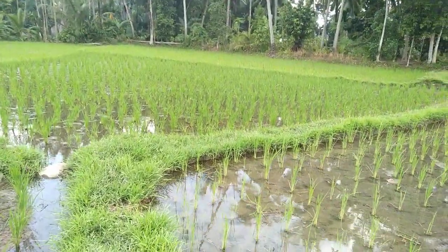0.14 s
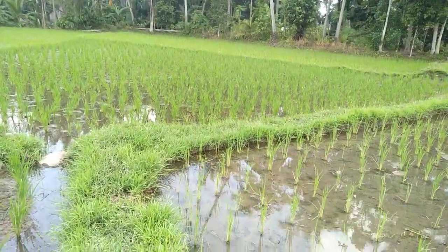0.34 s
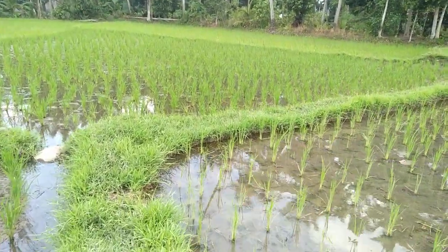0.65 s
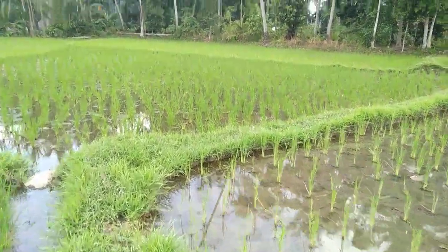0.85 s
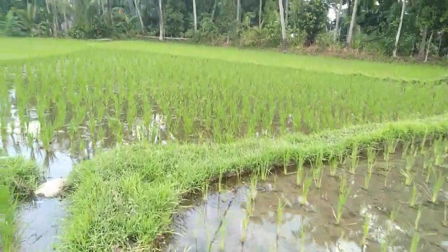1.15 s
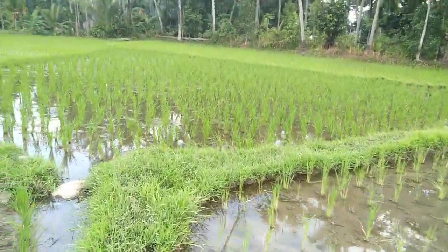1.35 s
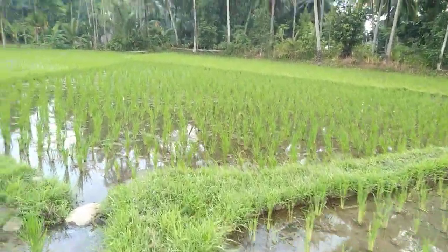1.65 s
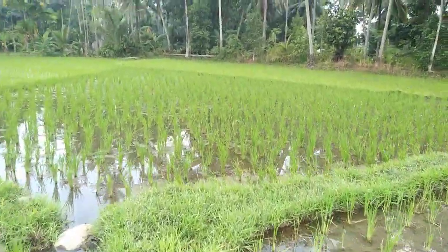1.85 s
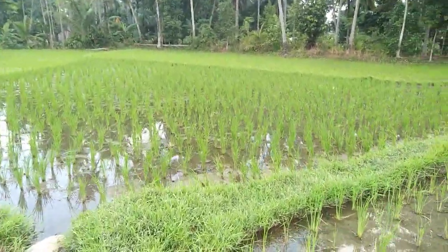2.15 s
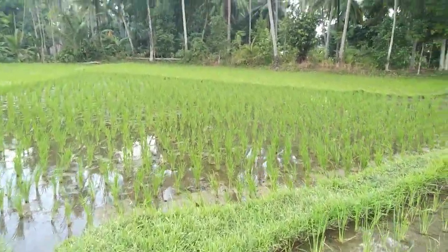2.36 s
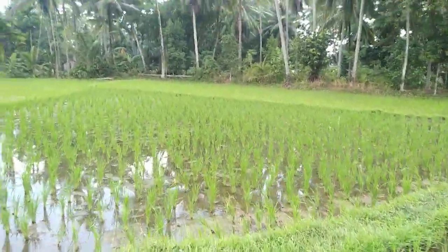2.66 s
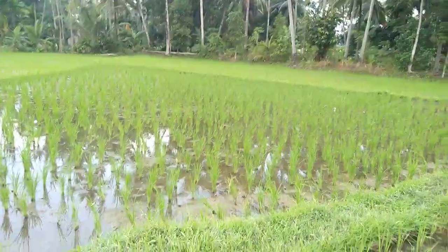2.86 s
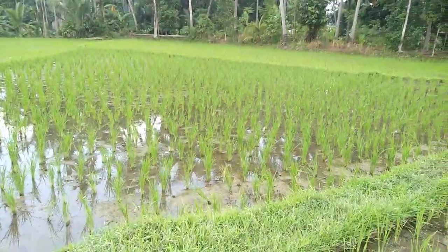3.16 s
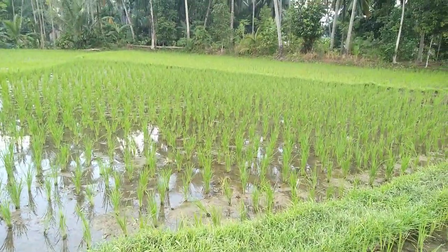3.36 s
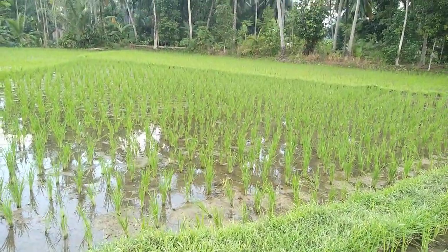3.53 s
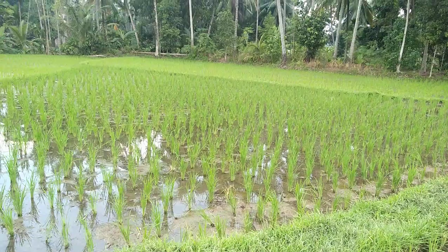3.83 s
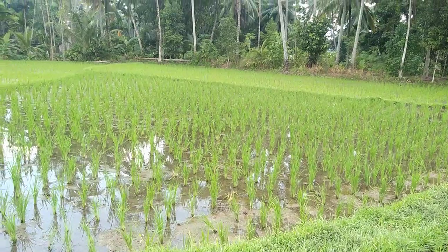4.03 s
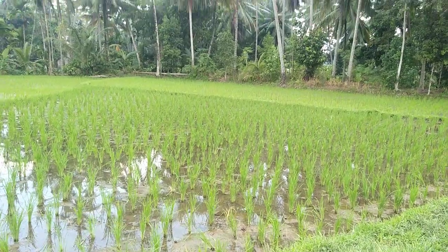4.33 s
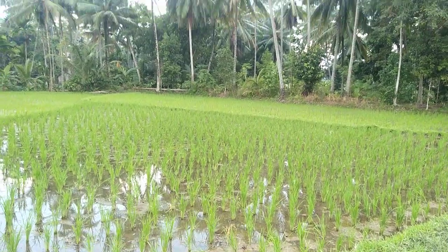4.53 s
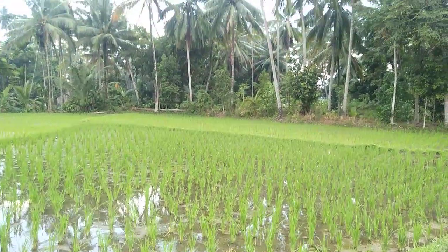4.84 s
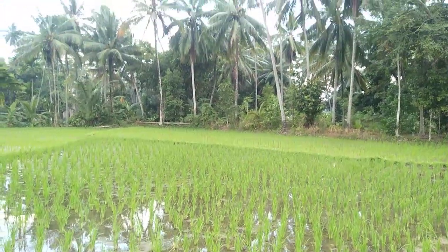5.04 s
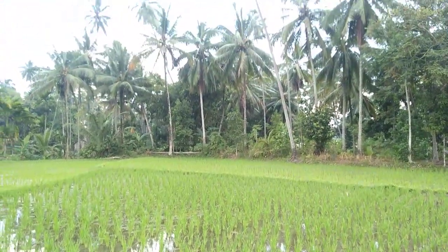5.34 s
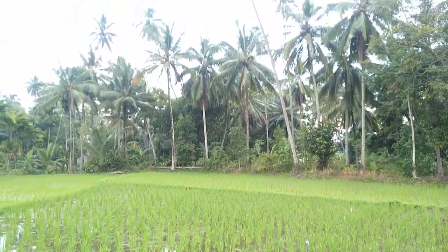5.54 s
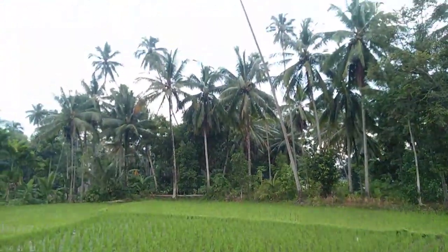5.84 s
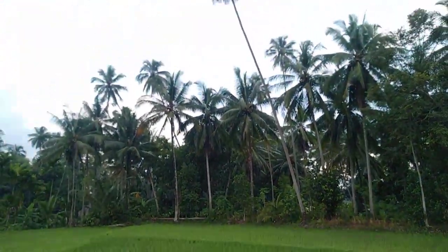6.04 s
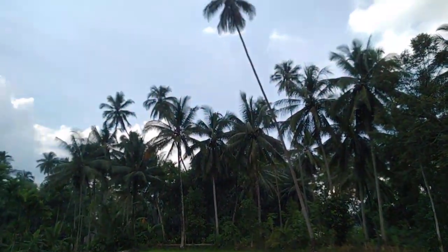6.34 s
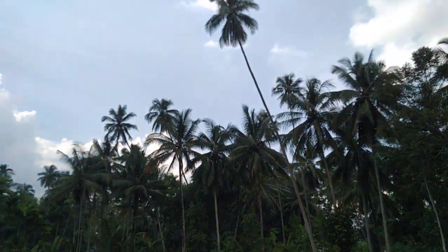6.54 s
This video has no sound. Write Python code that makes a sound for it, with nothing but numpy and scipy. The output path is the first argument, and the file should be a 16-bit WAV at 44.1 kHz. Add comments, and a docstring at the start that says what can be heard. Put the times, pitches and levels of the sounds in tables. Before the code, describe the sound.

Steady, piercing bird chirps with falling pitch lead throughout, with a short leafy echo. In the first three seconds, legs brush through grass in uneven swishes over soft footfalls; two or three dull clicks hit the microphone body. Afterwards the walking stops, leaving lumpy low rumble, blurred far fowl and soft hoots, while a remote engine pulses louder and a thin insect trill barely appears.

```python
"""A small bird repeats high falling chirps over flooded rice paddies; the palm grove throws them back.
Someone takes a few swishing steps along the grassy bank, bumps the camera twice and stands still.
Far off an engine drones and draws nearer, fowl call from behind the trees and an insect trills."""
import sys
import numpy as np
from scipy import signal
from scipy.fft import rfft, irfft
from scipy.io import wavfile
from scipy.ndimage import map_coordinates

SR = 44100
rng = np.random.default_rng(int(sys.argv[2]) if len(sys.argv) > 2 else 0)


def store_pcm(level_fs):
    """Save levels as 16-bit WAV."""
    pcm = np.round(np.clip(level_fs, -1, 1) * 32767).astype(np.int16)
    wavfile.write(sys.argv[1], SR, np.atleast_2d(pcm).T)


N = 295029

# one row a note: (s, rise s, fall s, start Hz, top Hz, end Hz, level dB)
CHIRPS = [
    (-.17, 0.0411, 0.0237, 4460, 5250, 4270, -48.5),
    (0.296, 0.01976, 0.091, 4286, 5252, 3598, -52.5), (0.412, 0.014, 0.0563, 4618, 5022, 3247, -51),
    (.878, 0.0118, .068, 4538, 5376, 3562, -51), (.998, 0.0462, 0.0262, 4440, 5021, 4415, -53),
    (1.5, 0.0093, 0.067, 4730, 5036, 3567, -48.5),
    (1.971, 0.01176, 0.0928, 4942, 5230, 3548, -51.5), (2.045, 0.037, 0.0273, 3980, 5000, 4037, -53),
    (2.561, 0.0419, 0.0505, 3300, 5012, 3647, -49),
    (3.06, 0.0203, 0.085, 4538, 5552, 3390, -49.5), (3.148, 0.0419, 0.021, 4380, 5254, 4434, -52),
    (3.652, 0.0124, 0.0824, 4350, 5430, 3346, -47.5), (3.722, 0.00876, 0.076, 4689, 5044, 3103, -53.5),
    (4.271, 0.0162, 0.1036, 4260, 5464, 3209, -49),
    (4.844, .01, 0.107, 4353, 5467, 3254, -48), (4.935, 0.05935, 0.0273, 4516, 5089, 4043, -53.5),
    (5.511, 0.0375, .085, 3670, 5149, 2973, -51),
    (5.972, 0.01618, 0.0903, 4400, 5440, 3318, -51), (6.07, 0.057, 0.0392, 4853, 5251, 3772, -56),
    (6.513, 0.0199, 0.0896, 4600, 5286, 3255, -51.5), (6.625, 0.0187, 0.04975, 4749, 5074, 3607, -55)]
BEAK = [(3000, -26), (3500, -18.5), (4100, -11), (4600, -5), (5000, -2.5), (5280, -5.5), (5600, -4.5)]  # (Hz, dB)
# other birds in the grove: (s, rise s, fall s, start Hz, top Hz, end Hz, roundness of the top, level dB)
WHISTLES = [
    (2.11, 0.022, 0.074, 4150, 4629, 4556, 1.114, -63.5), (3.64, 0.11, 0.0354, 5427, 6487, 6042, 1.56, -68),
    (4.745, 0.0119, 0.0445, 2603, 2674, 2500, 0.83, -75), (5.555, 0.0076, 0.091, 2215, 2232, 1962, 1.61, -67)]
# the clearer calls of distant fowl: (s, length s, start Hz, end Hz, level dB, octave above dB)
FAR_CALLS = [
    (-.1, 0.479, 367, 363.2, -67, -20), (.344, 0.101, 691.6, 764.7, -61.5, -15.5), (.395, 0.297, 733.9, 710.7, -71, 1.5), (.394, 0.308, 863, 902.9, -67.5, -39.5),
    (.855, 0.0804, 844.2, 784.6, -72, 1.5), (1.185, 0.0484, 753, 724, -61.5, -41.5), (1.472, 0.066, 817.8, 917, -63, -2.5), (1.62, 0.137, 879, 806, -70.5, -2),
    (1.852, 0.1107, 782, 1059, -65, -25), (2.031, 0.322, 827.5, 853.1, -67, -12.5), (2.181, 0.0496, 588.3, 641.3, -64, -10.5),
    (2.45, 0.212, 882, 834.2, -68.5, -9.5), (3.01, 0.128, 799.4, 783.4, -80.5, 14.5), (3.231, 0.125, 785.5, 779.2, -70, -2), (3.264, 0.3227, 572.8, 548, -74, -25.5),
    (3.61, 0.3355, 787.9, 765.4, -67, -8.5), (3.708, 0.17, 693.2, 665.6, -66.5, -28.5), (4.08, 0.053, 771, 757.5, -84.5, 8.5), (4.218, 0.0547, 771.4, 733, -68, -30),
    (4.395, 0.0528, 743.3, 720, -72, -12.5), (4.934, 0.0336, 848, 886.7, -67, -34.5)]
GRASS = [(530, -49), (900, -13), (1350, -23), (1430, -5), (1670, -31.5), (1880, -4.5), (2280, 5), (2660, 4),
         (3800, -9.5), (4380, -7), (6260, -5), (8950, -22), (10600, -21), (11800, -23.5), (15500, -41)]  # (Hz, dB per Hz)
# blows on the camera body and soft footfalls: (s, peak dB, ring Hz, t60 s, click dB against the peak)
KNOCKS = [(2.8131, -40, 587, 0.0142, -28), (2.8246, -21, 666, 0.00465, -8), (2.937, -18, 313, 0.01093, -13)]
FOOTFALLS = [(1.254, -38, 84.7, 0.044), (1.524, -33, 95.4, 0.0476), (1.906, -35.5, 82.8, 0.043), (2.015, -32.5, 92.4, 0.0181), (2.502, -29.5, 102.2, 0.01366), (2.521, -26.5, 119.5, 0.0241), (2.927, -31.5, 134.4, 0.026), (5.265, -45.5, 69.7, 0.0539)]  # (s, peak dB, Hz, length s)
SNAPS = [(0.0632, -48), (0.374, -51.5), (.894, -46), (.918, -43.5), (1.803, -63), (2.506, -42.5), (2.699, -46), (2.722, -43), (3.098, -53)]  # stalks: (s, peak dB)
# air on the microphone is strongest while walking: (s, dB)
RUMBLE = [(0, -55), (.3, -58.5), (.9, -74.5), (1.08, -58), (1.4, -53), (1.55, -49), (2.2, -49), (3.05, -46.5), (3.25, -54.5), (3.6, -58.5), (3.9, -48.5), (4.3, -54), (5.3, -55.5), (5.7, -68), (5.98, -53.5), (6.3, -60.5), (6.69, -51)]
RUMBLE_TONE = [(15, -2.5), (30, -2), (60, 5), (100, 2.5), (150, 1), (190, -13.5), (260, -27), (500, -56.5)]  # (Hz, dB per Hz)
RUB_TONE = [(150, -16), (230, 14), (320, 10.5), (420, -11), (600, -28.5), (1000, -21), (2000, -33.5), (4000, -47.5)]  # (Hz, dB per Hz)
# the boom of the exhaust shifts as the engine moves: (s, centre Hz)
BOOM = [(0, 127.3), (2.9, 132.1), (3.3, 116.4), (4.6, 133.4), (5.6, 158), (5.85, 133.4), (6.2, 148.5), (6.42, 114.6), (6.69, 114)]
FLOOR = [(20, -23.5), (100, 1.5), (250, -16), (500, -12.5), (900, -18), (1500, -18), (3000, -22), (5000, -24), (8000, -25), (12000, -26), (15500, -27)]  # (Hz, dB per Hz)
INSECT = [(0, -99), (1.2, -90), (4.75, -108), (4.9, -91), (5.4, -85.5), (5.85, -93), (6.1, -86.5), (6.69, -83.5)]  # (s, dB)
LEAD = SR // 2  # calls already under way still echo
EDGE_HZ = 15700  # fixed
TIME = np.arange(N) / SR
# the engine: (s, firings a second)
SPEED = [(0, 28.97), (1.1, 27.2), (1.6, 26.65), (2.2, 27.8), (3, 28.42), (3.4, 27.15), (3.85, 26.2), (4.25, 26.13), (4.7, 26.1), (5, 29.52), (5.3, 28.8), (5.65, 30.7), (6, 29.8), (6.28, 29.65), (6.45, 29.2), (6.69, 24.63)]
# it draws nearer, fading in and out across the fields: (s, dB at the boom)
DRONE = [(0, -59), (.9, -72.5), (1.6, -57), (3.1, -50), (3.55, -57.5), (3.85, -51), (4.1, -60), (4.62, -53), (4.77, -71), (4.92, -46.5), (5.1, -53), (5.3, -45), (5.68, -55.5), (5.85, -46.5), (6.2, -45), (6.69, -43.5)]
# the blur of far-off animals behind the trees: (s, dB) and (Hz, dB per Hz)
DIN = [(0, -72), (1, -75.5), (1.8, -69), (2.7, -84.5), (3.3, -72), (4.2, -80.5), (5, -82), (6, -77), (6.69, -106)]
DIN_TONE = [(200, -3), (400, 3), (560, -9), (800, 0.5), (1050, -15), (1300, -10), (1600, -24.5), (2200, -43), (4000, -58)]
# single reflections from water and bank: (delay s, dB)
SLAPS = [(.0011, -20), (.0047, -6.5), (0.0133, -16)]
ROUND_SLOW, ROUND_QUICK, ROUND_S = 1.08, 1.8, 0.029  # short notes have the rounder top
# soft low hoots, perhaps a dove: (s, length s, level dB)
COOS = [(3.983, 0.0655, -68.5), (4.273, 0.163, -70.5), (4.578, 0.168, -65.5), (5.336, 0.0655, -67.5), (5.74, 0.1085, -64.5)]
# a leg sweeps through the grass: (s at full speed, hold s, level dB, fizz dB and rasp dB against that level)
SWISHES = [(.365, 0.028, -84.5, 9, 10), (.55, .02, -83.5, 8, -7.5), (.615, 0.026, -69.5, -12, 5.5), (0.676, 0.108, -58, -15.5, 3), (.8, 0.1481, -55.5, -17, -1.5), (1.492, 0.0904, -54.5, -13, -3.5), (1.71, 0.057, -55, -19, -1),
           (1.85, 0.016, -69.5, -5.5, -14), (2.286, 0.034, -73, -15.5, 12), (2.383, 0.178, -57.5, -14, 2), (2.71, 0.0073, -74, 2.5, -2.5), (2.905, 0.033, -71.5, 10, -18), (2.982, 0.043, -54.5, -12, 2.5), (3.11, 0.0067, -60, -11, -0.5)]
SWISH_RISE_DB_PER_S, SWISH_START_S = 97, 0.0684  # the swell is steepest at first
SWISH_FALL_DB_PER_S, SWISH_STOP_S = 82, 0.159  # blades spring back, then settle ever faster
GUSTS_PER_S, GUST_DB = 11, 3.5
# the hand shifts on the camera: (s, length s, level dB)
RUBS = [(0.954, 0.027, -58.5), (2.142, 0.0646, -59.5), (2.544, .17, -54), (2.982, 0.1169, -56.5), (3.203, 0.044, -60), (4.17, 0.09, -60), (4.385, 0.0754, -61), (4.651, 0.0398, -63.5), (5.237, 0.04326, -63.5)]
GRIP_DB = -23  # the steady grip, against the rumble
BOOM_WIDTH_HZ = 14.5
MUTTER = [(0, -27), (4.8, -26), (5.9, -22.5), (6.3, -11), (6.45, -24), (6.69, -20)]  # level of the upper orders: (s, dB against the boom)
# each note keeps the end pitch given in its row
START_HZ = None
CLUCKS, CLUCK_S, CLUCK_LOW_HZ, CLUCK_HIGH_HZ, CLUCK_DB, CLUCK_OCTAVE_DB = 22, .06, 562.7, 952.7, -0.5, -24.5  # chance clucks, level against the din
COO_HZ, COO_OCTAVE_DB = 515.27, -22.5
TRILL_BURSTS_PER_S, TRILL_DEPTH_DB = 18, 4
ORDERS_DB = [(2, -19), (3, -11.5), (4, -7.5), (5, -7.5), (6, -10)]  # outside the boom: (order, dB)
SWEEP_DB_PER_KHZ_PER_S = 0.0923  # the whistle thins while its pitch moves fast
DROP_HZ = None
DROP_S = None
# a faint high tick, the bird's second voice, leads into each long falling note
TICK_LEAD_S, TICK_S, TICK_HZ, TICK_DB = 0.0071, 0.00864, 5632, -17.5
TICK_FALL_S = .09  # fixed
SNAGS_PER_S, SNAG_DB = 22, 1.0949  # blades catch and let go unevenly


def amp(db):
    """Decibels to gain."""
    return 10 ** (np.asarray(db) / 20)


def unit(x):
    """Scales to rms 1."""
    return x / np.sqrt(np.mean(x ** 2) + 1e-20)


def read(points, hz):
    """A spectrum table in dB, read on a log-frequency axis."""
    f, db = np.transpose(points)
    return np.interp(np.log(hz + 1), np.log(f + 1), db)


def follow(rows, t=TIME):
    """The columns of a curve table at the times t."""
    s, *columns = np.transpose(rows)
    return [np.interp(t, s, c) for c in columns]


def colour(x, points):
    """Filters x by a spectrum table."""
    return irfft(rfft(x) * amp(read(points, np.fft.rfftfreq(len(x), 1 / SR))), len(x))


def band(x, lo_hz, hi_hz, order=2):
    """Causal band-pass."""
    return signal.sosfilt(signal.butter(order, [lo_hz, min(hi_hz, SR / 2 - 1)], "band", fs=SR, output="sos"), x)


def drift(rate, size=N):
    """Smooth chance of rms about 1 that changes rate times a second."""
    knots = rng.standard_normal(4096)
    return map_coordinates(knots, [np.arange(size) * rate / SR], order=2, mode="wrap")


def add(mix, s, sound):
    """Mixes a sound in at s seconds."""
    part = mix[max(round(s * SR), 0):][:len(sound)]
    part += sound[:len(part)]


def grove(x, t60, onset):
    """Scatter from trunks and fronds: sparse reflections that build up and die away."""
    t = np.arange(SR) / SR
    taps = rng.standard_normal(SR) * (rng.random(SR) < 2500 / SR)  # fixed
    tail = taps * amp(-60 * t / t60) * (1 - np.exp(-(t / onset) ** 2))
    return signal.fftconvolve(x, tail / np.linalg.norm(tail))[:len(x)]


def sing(notes, beak, waver, flutter_db):
    """Each note is a pure whistle that sweeps up and slides down, loudest where the beak resonates."""
    out = np.zeros(N + LEAD)
    for s, rise, fall, start_hz, top_hz, end_hz, roundness, db in notes:
        t = np.arange(0, rise + fall, 1 / SR)
        up, down = np.clip(t / rise, 0, 1), np.clip((t - rise) / fall, 0, 1)
        hz = start_hz + (top_hz - start_hz) * (1 - (1 - up) ** np.clip(roundness, 1, 2)) - (top_hz - end_hz) * np.sin(np.pi / 2 * down ** roundness)
        thinning_db = SWEEP_DB_PER_KHZ_PER_S * abs(np.gradient(hz, t)) / 1000  # fixed
        hz = hz * (1 + waver * drift(243.4, size=len(t)))
        swell = np.minimum(t / 0.0059, 1) * np.minimum((t[-1] - t) / 0.0031, 1)
        level = swell * amp(db + 2 - thinning_db + read(beak, hz) + flutter_db * drift(121.94, size=len(t)))
        add(out, s + LEAD / SR, level * np.sqrt(2) * np.sin(2 * np.pi * np.cumsum(hz) / SR))
    return out


def birds():
    """The near bird with its reflections, and fainter whistles from inside the grove."""
    ticks = [(s - TICK_LEAD_S, TICK_S, TICK_S, TICK_HZ, TICK_HZ, TICK_HZ, 1, db + TICK_DB) for s, _, fall, *_, db in CHIRPS if fall > TICK_FALL_S]
    near = sing([chirp(*row) for row in CHIRPS], BEAK, waver=.008, flutter_db=4.0)
    others = sing(WHISTLES + ticks, [(2000, -4), (7000, -3.5)], waver=0.011, flutter_db=1.5)
    slaps = np.zeros(N + LEAD)
    for delay, db in SLAPS:
        add(slaps, delay, amp(db) * near)
    scatter = amp(-2.5) * grove(near, t60=0.379, onset=0.00505)
    # only the strongest pitches carry to the far trees and back
    lingering = amp(-10.0) * grove(band(near, 4759, 5300), t60=0.4, onset=0.231)
    hidden = others + amp(-0.5) * grove(others, t60=0.22, onset=0.0029)
    return (near + slaps + scatter + lingering + hidden)[LEAD:]


def fowl():
    """Far calls are hoarse, keep only two partials and are smeared by scatter from the trees."""
    out = np.zeros(N + LEAD)
    for s, length, start_hz, end_hz, db, octave_db in far_calls():
        size = round(length * SR)
        hz = np.linspace(start_hz, end_hz, size) * (1 + .03 * drift(170, size=size) + .02 * drift(20, size=size))  # fixed
        phase = 2 * np.pi * np.cumsum(hz) / SR
        add(out, s + LEAD / SR, amp(db) * (np.sin(phase) + amp(octave_db) * np.sin(2 * phase)) * signal.windows.tukey(size, .3))
    din_db, = follow(DIN)
    din = amp(din_db) * unit(patchy(colour(rng.standard_normal(N), DIN_TONE), db=5.5, width_hz=70, length=.09))  # fixed
    scatter = grove(out, t60=.4, onset=.004)  # fixed
    return (out + amp(2.5) * scatter)[LEAD:] + din


def grass():
    """Blades rub past the legs: dense grains whose low rasp and high fizz change through each stride."""
    grains = rng.standard_normal(N) * amp(1.59 * drift(300)) + 0.322 * unit(rng.standard_normal(N) ** 3 * (rng.random(N) < 1500 / SR))
    swish = patchy(colour(grains, GRASS), db=2.6, width_hz=330, length=.04)  # fixed
    rasp = colour(swish, [(3000, 0.5), (4500, -25.5)])
    fizz = colour(swish, [(7800, -77), (9500, -2.5)])
    body = swish - rasp - fizz
    body, fizz, rasp = body / np.std(band(body, 4970, 9000, order=4)), unit(fizz), unit(rasp)
    power = np.zeros((3, N))
    for s, hold, db, fizz_db, rasp_db in SWISHES:
        before, after = np.maximum(s - TIME, 0), np.maximum(TIME - s - hold, 0)
        level = db - SWISH_RISE_DB_PER_S * before * (1 + before / SWISH_START_S) - SWISH_FALL_DB_PER_S * after * (1 + after / SWISH_STOP_S)
        power += amp([level, level + fizz_db, level + rasp_db]) ** 2
    snags = amp(SNAG_DB * np.array([drift(SNAGS_PER_S) for _ in power]))
    return (np.sqrt(power) * snags * [body, fizz, rasp]).sum(0)


def snaps():
    """Stiff stalks tick underfoot."""
    out, t = np.zeros(N), np.arange(1500) / SR
    for s, db in SNAPS:
        tick = band(rng.standard_normal(len(t)) * np.exp(-t / 0.00092), 2140, 12000)
        add(out, s, amp(db) * tick / abs(tick).max())
    return out


def bumps():
    """Fingers knock the camera, which rings briefly and rattles; feet thud on the soft bank."""
    out, t = np.zeros(N), np.arange(SR // 4) / SR
    for s, db, hz, t60, click_db in KNOCKS:
        ring = -np.sin(2 * np.pi * hz * t) * amp(-60 * t / t60)
        click = -band(np.exp(-t / .00004), 280, 7800, order=1)
        add(out, s, amp(db) * (ring + amp(click_db) * click / abs(click).max()))
        scuff = colour(rng.standard_normal(len(t)), [(100, -17), (350, 17.5), (800, 5.5), (1500, 3.5), (3000, -12.5), (7000, -12.5), (14000, -28)])
        add(out, s, amp(db - 25.5) * unit(scuff) * amp(-60 * t / 0.312))
    for s, db, hz, length in FOOTFALLS:
        u = t / (length / 2)
        add(out, s, amp(db) * u ** 2 * np.exp(1 - u ** 2) * np.sin(2 * np.pi * hz * t))
    return out


def engine():
    """Heard from afar, only the low orders of the firing rate carry; the one nearest the exhaust's boom leads."""
    (rate,), (db,), (boom_hz,), (mutter_db,) = follow(SPEED), follow(DRONE), follow(BOOM), follow(MUTTER)
    phase = 2 * np.pi * np.cumsum(rate * (1 + 0.00574 * drift(15))) / SR
    out = np.zeros(N)
    for k, outside_db in ORDERS_DB:
        boom = np.maximum(np.exp(-.5 * ((k * rate - boom_hz) / BOOM_WIDTH_HZ) ** 2), amp(outside_db))
        out += boom * amp(db - 0.5 + 3.39 * drift(12)) * np.sqrt(2) * np.sin(round(k) * phase + 0.398 * drift(15) + rng.normal(0, 0.472))
    for k in range(7, 14):
        # uneven firings smear the higher orders into a mutter
        mutter = drift(17) * np.sin(k * phase) + drift(13) * np.cos(k * phase)
        out += amp(db + mutter_db + read([(200, 8.5), (240, 1.5), (300, -3.0), (335, -15), (390, -23.0)], k * rate)) * mutter
    return out


def air():
    """Lumpy rumble of air and hands on the microphone, over the hush of the open field."""
    rumble_db, = follow(RUMBLE)
    gusts = amp(rumble_db + GUST_DB * drift(GUSTS_PER_S))
    rumble = gusts * unit(colour(rng.standard_normal(N), RUMBLE_TONE))
    grip = amp(GRIP_DB) * gusts + sum(amp(db) * np.exp(-2 * ((TIME - s) / length) ** 2) for s, length, db in RUBS)
    rub = grip * unit(colour(rng.standard_normal(N), RUB_TONE))
    return rumble + rub + amp(-74) * unit(colour(rng.standard_normal(N), FLOOR))


def insect():
    """A thin, unsteady trill."""
    db, = follow(INSECT)
    shimmer = amp(1.93 * drift(40) + TRILL_DEPTH_DB * drift(TRILL_BURSTS_PER_S))
    return amp(db) * shimmer * unit(band(rng.standard_normal(N), 7660, 7940, order=3))


def patchy(x, db, width_hz, length):
    """Lets patches of the spectrum, width_hz wide and length seconds long, swell and fade by chance."""
    z = signal.stft(x, SR, nperseg=1024, noverlap=768)[2]
    bins, frames = np.indices(z.shape)
    field = map_coordinates(rng.standard_normal((256, 256)), [bins * SR / 1024 / width_hz, frames * 256 / SR / length], order=1, mode="wrap")  # fixed
    return signal.istft(z * amp(db * unit(field)), SR, nperseg=1024, noverlap=768)[1][:len(x)]


def chirp(s, rise, fall, start_hz, top_hz, end_hz, db):
    """A note that falls quickly is a round arch; one that falls slowly has a pointed top."""
    return s, rise, fall, start_hz, top_hz, end_hz, ROUND_SLOW + ROUND_QUICK * np.exp(-fall / ROUND_S), db


def far_calls():
    """Fowl calls, hoots, and chance clucks that are as loud as the din around them."""
    coos = [(s, length, COO_HZ, COO_HZ, db, COO_OCTAVE_DB) for s, length, db in COOS]
    clucks = []
    for when, pitch, bend in rng.random((int(CLUCKS), 3)):
        s, hz = when * N / SR, CLUCK_LOW_HZ + pitch * (CLUCK_HIGH_HZ - CLUCK_LOW_HZ)
        clucks.append((s, CLUCK_S, hz, hz * (1 + 0.23 * (bend - .5)), follow(DIN, s)[0] + CLUCK_DB, CLUCK_OCTAVE_DB))
    return FAR_CALLS + coos + clucks


def scene():
    """Everything at the one microphone."""
    return (birds() + fowl() + grass() + snaps() + bumps() + engine() + air() + insect())[None]


def record(dry):
    """The recorder's band limit."""
    return signal.oaconvolve(dry, signal.firwin(801, EDGE_HZ, window=("kaiser", 8), fs=SR)[None], "same")  # fixed


dry = scene()
out = record(dry)
store_pcm(out)
```